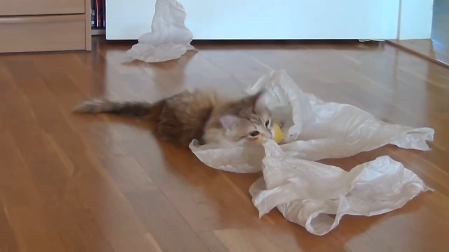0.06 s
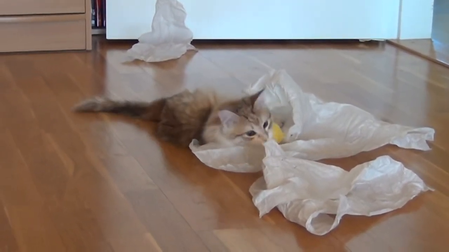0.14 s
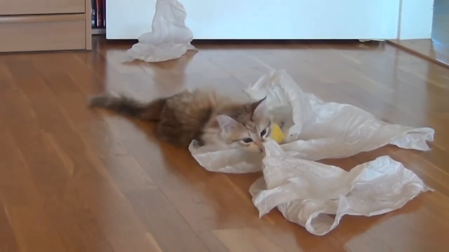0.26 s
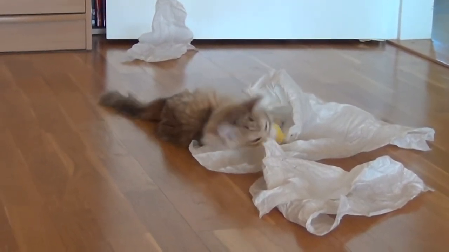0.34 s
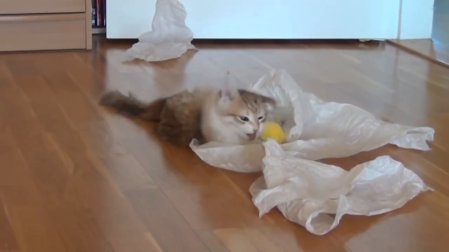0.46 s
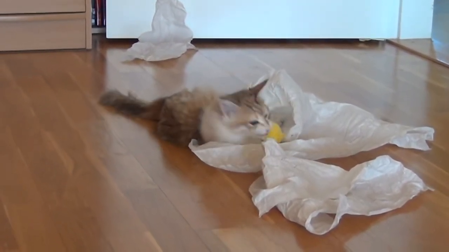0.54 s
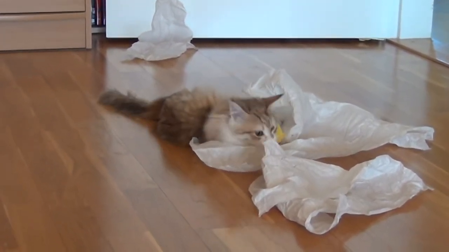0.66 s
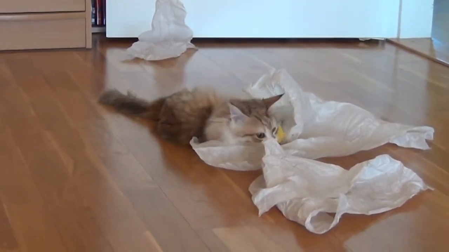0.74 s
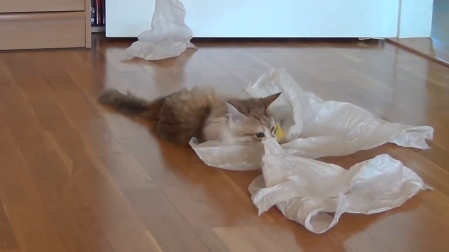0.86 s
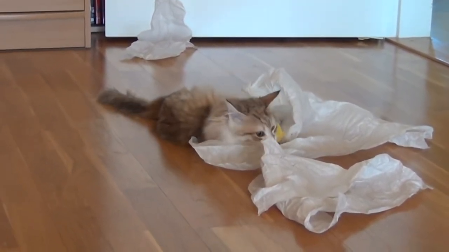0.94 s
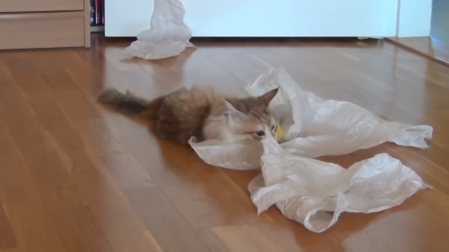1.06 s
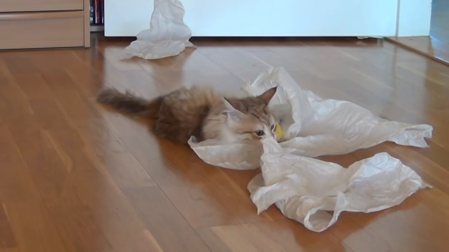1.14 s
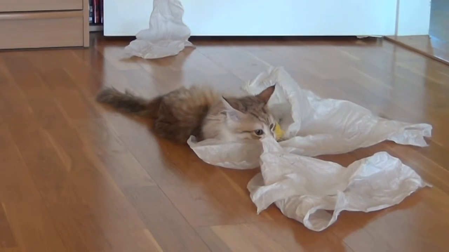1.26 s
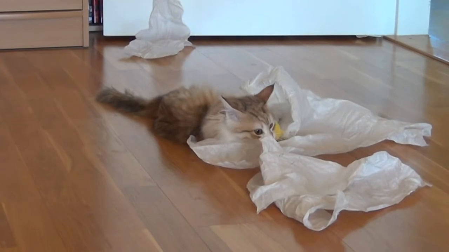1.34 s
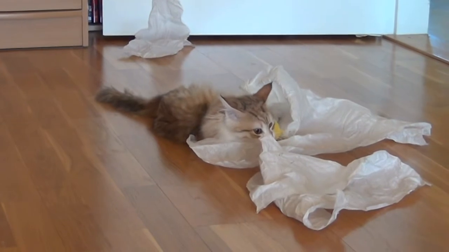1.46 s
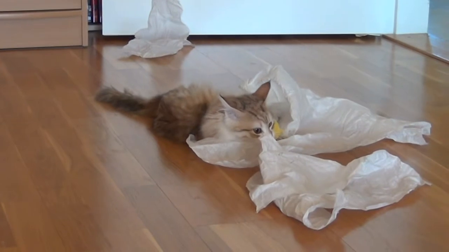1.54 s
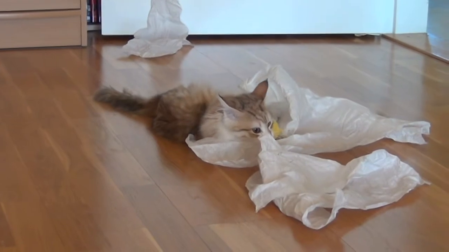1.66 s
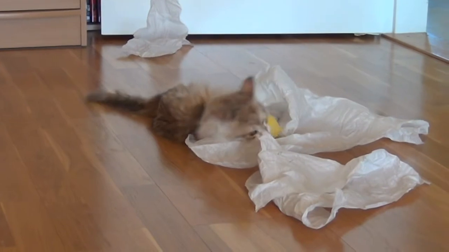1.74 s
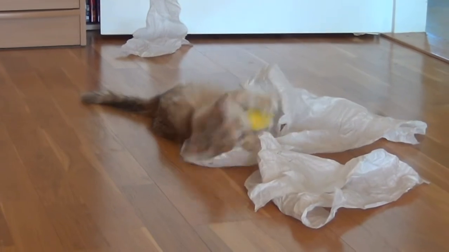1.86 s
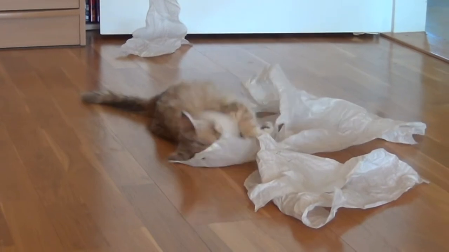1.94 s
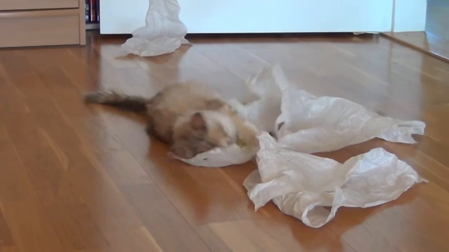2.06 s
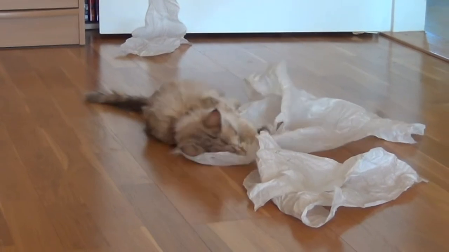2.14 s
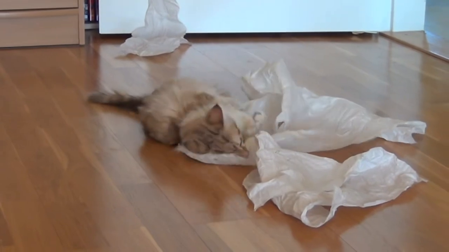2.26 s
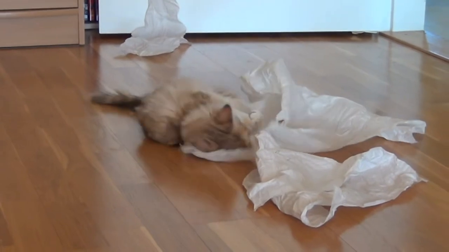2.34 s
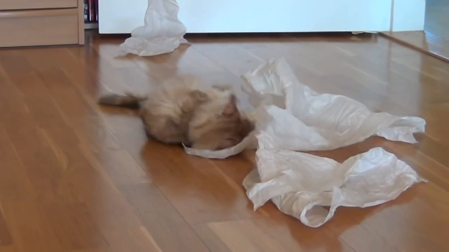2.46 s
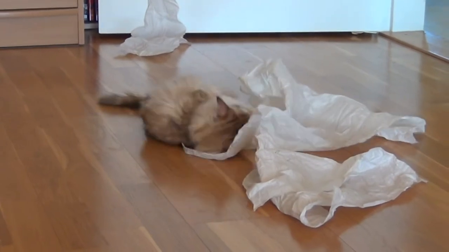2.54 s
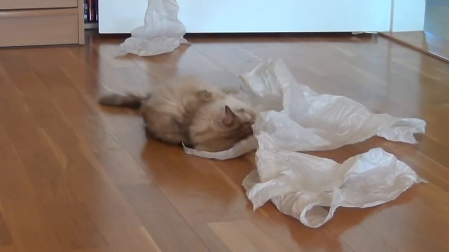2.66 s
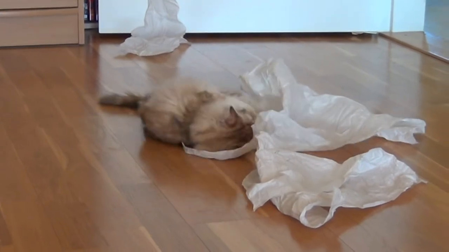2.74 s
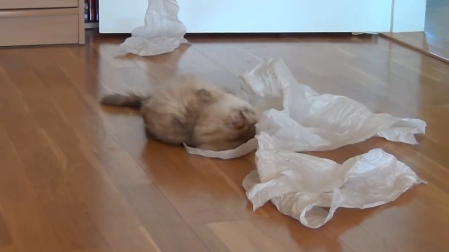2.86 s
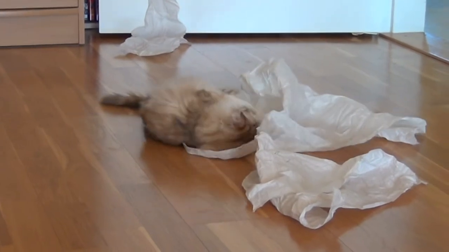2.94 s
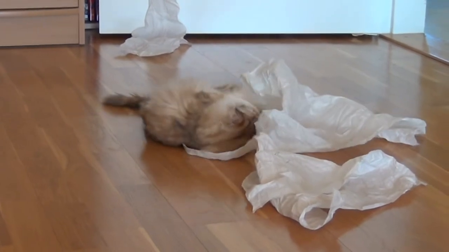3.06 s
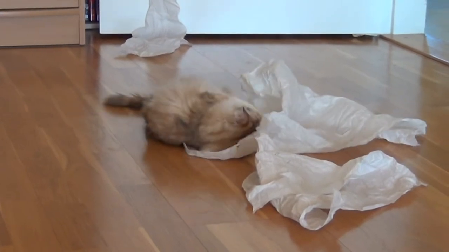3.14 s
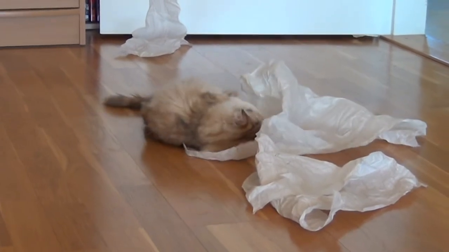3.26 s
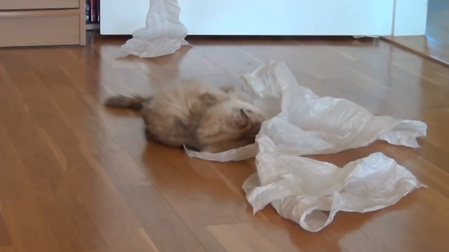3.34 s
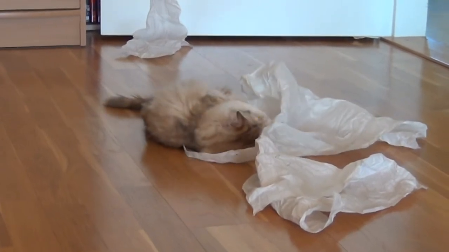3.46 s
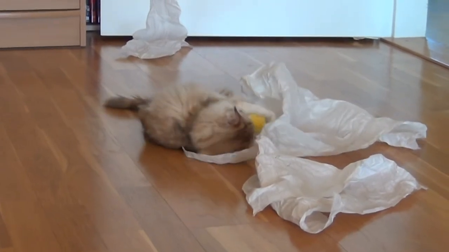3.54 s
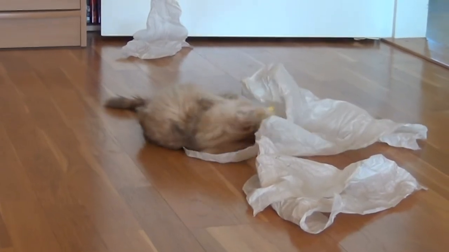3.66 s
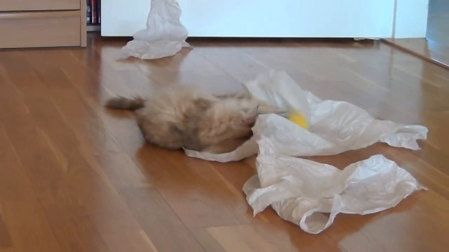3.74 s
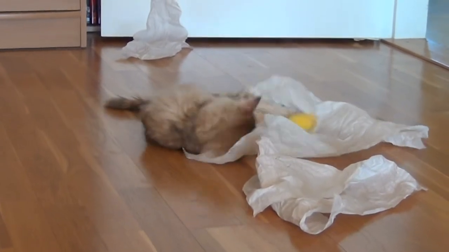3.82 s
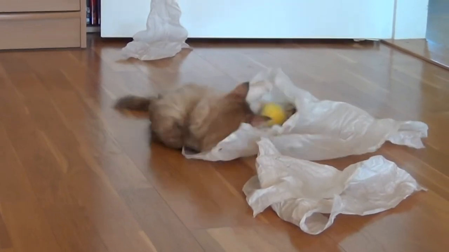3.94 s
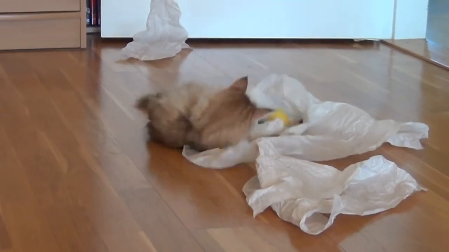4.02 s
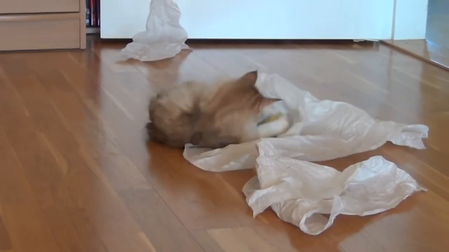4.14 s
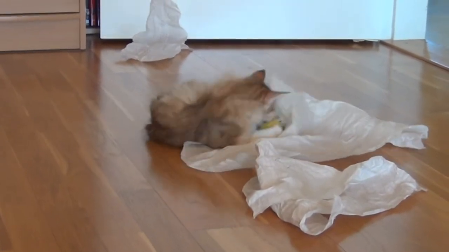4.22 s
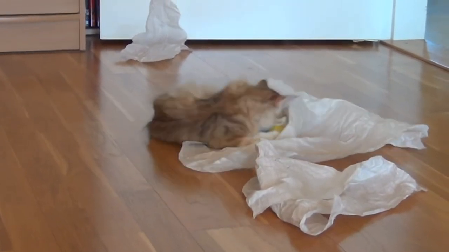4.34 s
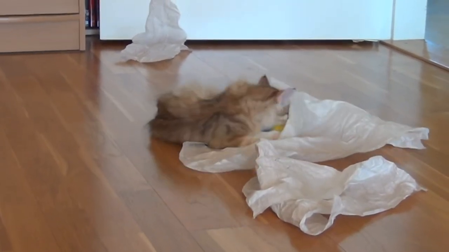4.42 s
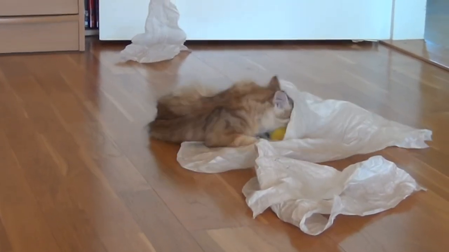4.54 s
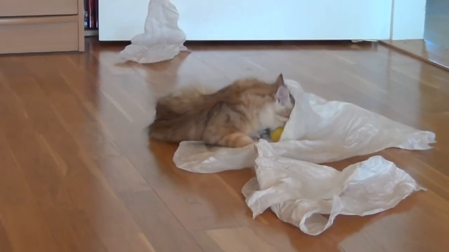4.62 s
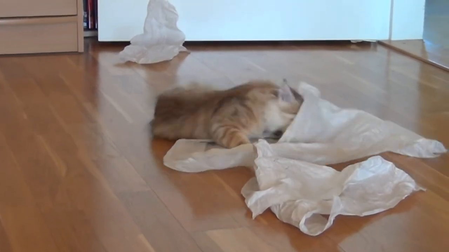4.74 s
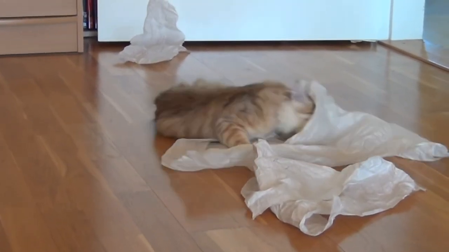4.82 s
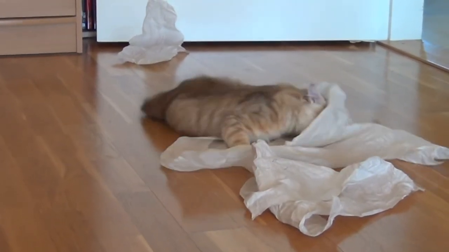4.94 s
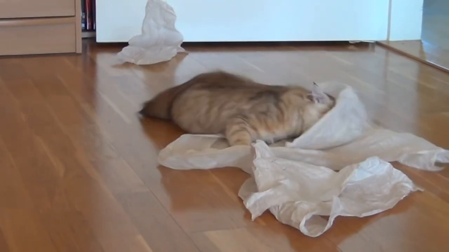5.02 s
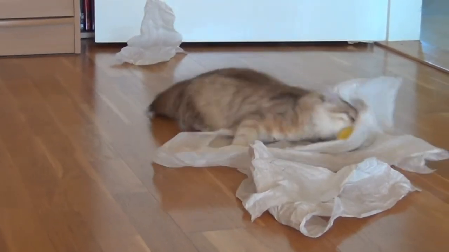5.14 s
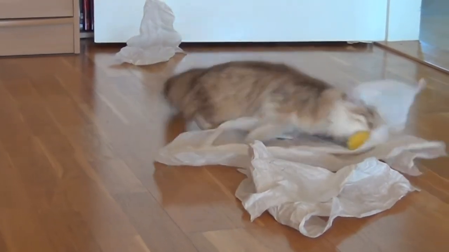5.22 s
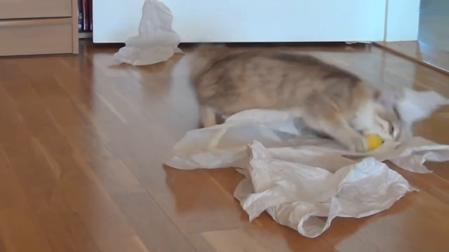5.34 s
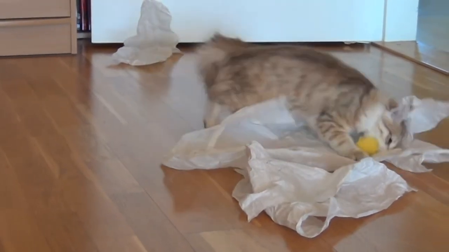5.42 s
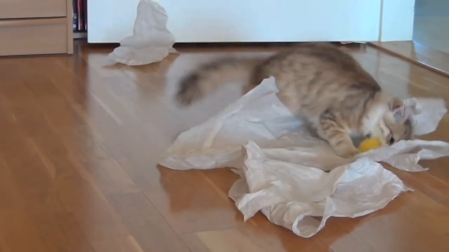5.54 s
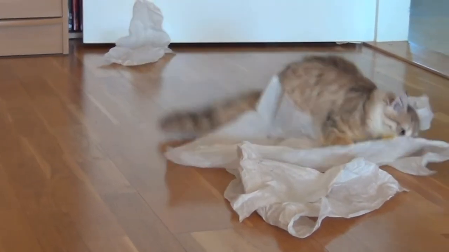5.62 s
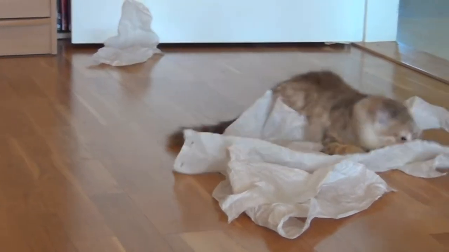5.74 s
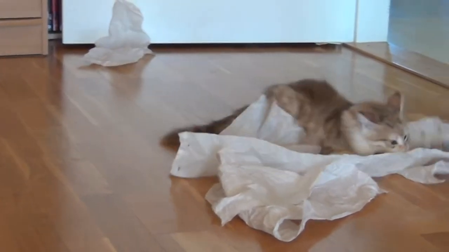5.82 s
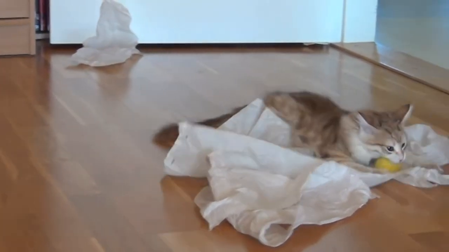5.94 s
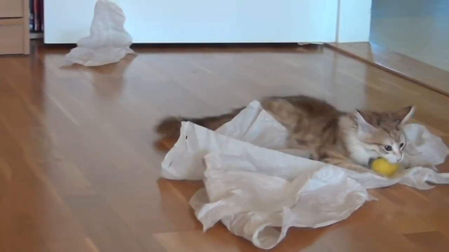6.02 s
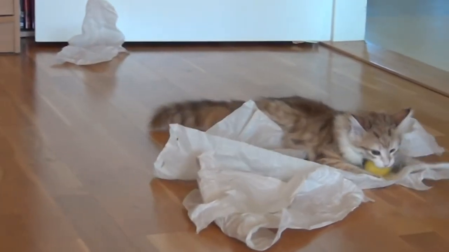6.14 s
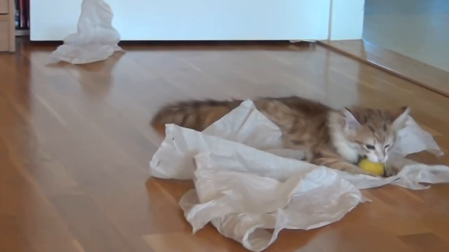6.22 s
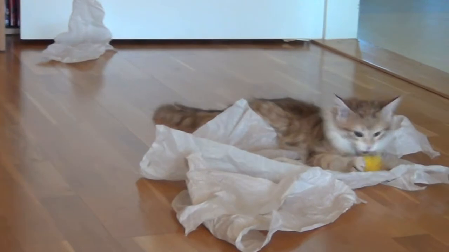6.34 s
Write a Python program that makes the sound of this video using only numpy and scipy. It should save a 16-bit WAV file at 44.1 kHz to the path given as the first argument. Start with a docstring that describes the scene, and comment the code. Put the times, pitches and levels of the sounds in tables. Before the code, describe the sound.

Light papery crackles fall nearly silent, then swell into busy, bright crumpling as a cat wrestles thin sheets in a bare, slightly echoing room.

```python
"""On a wooden floor in a bare room, a few metres from a camera, a cat noses, rolls and pounces in
crumpled tissue paper. The papery rush is thousands of tiny damped pops mixed with noise, tight creases
snap in bright bursts, hollows in the sheet ring briefly, and paws thump the boards with one low push.
The room answers with fading noise echoes, over a soft room tone and the camera's own hiss and whine."""
import sys
import numpy as np
from scipy import signal
from scipy.fft import rfft, irfft, next_fast_len
from scipy.io import wavfile
from scipy.ndimage import uniform_filter1d, map_coordinates

SR = 44100
rng = np.random.default_rng(int(sys.argv[2]) if len(sys.argv) > 2 else 0)


def gain_from_decibels(decibels):
    """Convert decibel values to linear amplitude factors."""
    exponent = np.asarray(decibels, float) / 20
    return 10 ** exponent


def store_pcm(level_fs):
    """Save levels as 16-bit WAV."""
    pcm = np.round(np.clip(level_fs, -1, 1) * 32767).astype(np.int16)
    wavfile.write(sys.argv[1], SR, np.atleast_2d(pcm).T)


N = 281358  # length in samples


def unit(x):
    """Scales a signal to rms 1."""
    return x / np.sqrt(np.mean(x ** 2) + 1e-20)


def along(points, hz):
    """Reads a curve of (Hz, value) points on a log frequency axis."""
    f, v = np.transpose(points)
    return np.interp(np.log(hz + 1), np.log(f + 1), v)


def wobble(rate):
    """A smooth random curve with rate knots a second."""
    knots = rng.standard_normal(int(N * rate / SR) + 4)
    return map_coordinates(knots, [np.arange(N) * rate / SR])


def filtered(x, response):
    """Shapes a signal by a response that depends on frequency."""
    m = next_fast_len(x.shape[-1] + 8192)
    spectrum = rfft(x, m) * response(np.fft.rfftfreq(m, 1 / SR))
    return irfft(spectrum, m)[..., :x.shape[-1]]


def paired(two, alike):
    """Mixes two unrelated signals into a left and right of given likeness at each frequency."""
    def mid_and_side(hz):
        turn = np.arccos(np.clip(along(alike, hz), -1, 1)) / 2
        return np.array([np.cos(turn), np.sin(turn)])

    mid, side = filtered(two, mid_and_side)
    return np.array([mid + side, mid - side])


def pops(s, hz, gain, cycles, size):
    """Sums damped sines at their times; each falls by 1/e in cycles / hz seconds."""
    t = np.arange(size) / SR
    decay = np.exp(-t * hz[:, None] / cycles)
    wave = gain[:, None] * np.sin(2 * np.pi * hz[:, None] * t) * decay
    at = np.round(s * SR).astype(int)[:, None] + np.arange(size)
    return np.bincount(at.ravel(), wave.ravel(), N + SR)[:N]


def burst(gain):
    """Gives each row of pops the same total energy."""
    return gain / np.linalg.norm(gain, axis=1, keepdims=True)


# How much the sheet creeps and settles between the cat's moves.
# Each row: time in seconds, level in dB.
STIR_LEVELS = [(0.0, -62), (0.7, -68), (1.3, -71), (1.87, -78), (2.0, -52.5), (2.5, -45.5), (3.3, -54),
               (3.9, -47.5), (4.15, -40.5), (4.55, -43), (5.2, -42), (5.5, -39.5), (5.7, -45.5),
               (5.97, -36.5), (6.16, -38), (6.25, -56), (6.38, -44)]
# The cat's nudges, rolls and pounces.
# Each row: peak time in seconds, level in dB, rise in ms, fall in ms, crispness in dB.
CAT_MOVES = [(0.001, -49.5, 10, 39, -3), (0.039, -53.5, 17, 33, -12), (0.085, -58, 9, 32, 2),
             (0.242, -55, 7.4, 47, -11.5), (0.503, -59.5, 17, 131, -7), (0.585, -51.5, 24, 92, 0.6),
             (0.684, -60, 36, 93, -2), (0.872, -58, 40, 69, -1.4), (0.943, -64.0, 11, 25, -4),
             (1.042, -52, 8.7, 40, -2), (1.143, -60, 17, 22, 1), (1.294, -60.5, 40, 41, -7),
             (1.912, -53, 18, 165, 0), (1.997, -47, 12, 236, 0), (2.041, -33.5, 22, 106, -2),
             (2.098, -34, 35, 77, 0.7), (2.261, -34, 73, 150, 0.5), (2.424, -42, 37, 27, 0.5),
             (2.53, -35, 19, 150, 0), (2.6, -33.5, 79, 49, 0), (2.69, -42, 20, 190, -2.5),
             (2.816, -42.5, 57, 140, -2.9), (2.961, -43, 170, 220, -4.4), (3.024, -44, 17, 240, -1.2),
             (3.234, -46, 72, 45, -1), (3.336, -48, 18, 52, -4.5), (3.44, -44, 30, 79, -6.5),
             (3.611, -49, 11, 217, -1.5), (3.715, -46, 98, 68, -7), (3.789, -40.5, 16, 52, -5),
             (3.824, -39, 22, 41, 0.5), (3.962, -31.5, 55, 120, 0), (4.103, -38.5, 73, 82, 0),
             (4.282, -29, 57, 30, 1.3), (4.393, -34, 24, 53, -1.5), (4.438, -33, 72, 41, 1.5),
             (4.67, -36, 24, 135, 1.2), (4.891, -33.5, 38, 130, -0.7), (4.979, -34.5, 14, 140, 4.5),
             (5.065, -32, 59, 150, 1.1), (5.298, -32, 85, 146, 3.1), (5.398, -34, 48, 240, 1.6),
             (5.587, -34.5, 57, 79, 2.2), (5.709, -37.5, 39, 29, 6), (5.766, -28, 7.3, 90, 4.5),
             (5.834, -32, 58, 30, -6.5), (6.03, -39, 120, 65, 6), (6.073, -25.5, 23, 33, 2.5),
             (6.199, -38.5, 63, 44, 3.5), (6.289, -37, 35, 62, 0.1), (6.375, -32, 21, 87, 1)]


def worked():
    """Levels in dB of billows, folds and creases: every move swells and dies over the slow stir."""
    billows_db, creases_db = -7.5, -0.25  # against the folds
    stir_crisp_db = -1.5  # crispness between moves
    crisp_thins = 0.86  # dB the billows lose for each dB of crispness
    swing_db = 10  # a move gains this much over its rise and loses it over its fall
    t = np.arange(0, N + 44, 44) / SR
    s, db, rise_ms, fall_ms, crisp_db = np.transpose(CAT_MOVES)[:, :, None]
    late_ms = 1000 * (t - s)
    slope_ms = np.maximum(np.where(late_ms < 0, rise_ms, fall_ms), 2)
    move_db = db - swing_db * np.abs(late_ms) / slope_ms
    stir_db = np.interp(t, *np.transpose(STIR_LEVELS))

    def total(follows):  # follows: how far this part of the paper sound obeys crispness
        moves = np.sum(gain_from_decibels(2 * (move_db + follows * crisp_db)), axis=0)
        stir = gain_from_decibels(2 * (stir_db + follows * stir_crisp_db))
        return 10 * np.log10(moves + stir)

    levels_db = billows_db + total(-crisp_thins), total(0), creases_db + total(1)
    return [np.interp(np.arange(N) / SR, t, level) for level in levels_db]


def gives(rate, fade_s):
    """A curve that jumps whenever the sheet gives way, then sinks back; rms 1 about zero."""
    jumps = (rng.random(N) < rate / SR) * rng.random(N)
    curve = signal.lfilter([1], [1, -np.exp(-1 / (fade_s * SR))], jumps)
    return unit(curve - curve.mean())


def crackle(count, size, centre_hz, octaves, cycles, scatter_db, clump_db, slide, spectrum):
    """Countless small buckles of uneven size and pitch, in clumps, over the hiss of sliding sheets; rms 1."""
    s, chance = rng.random((2, count))
    hz = np.clip(centre_hz * 2 ** (octaves * rng.standard_normal(count)), 150, 15000)
    size_db = np.minimum(-scatter_db * np.log(1 - chance), 15)
    gain = gain_from_decibels(size_db) * rng.choice([-1, 1], count)
    grains = unit(pops(s * N / SR, hz, gain, cycles, size))

    def evened(f):  # flattens the grains' broad spectrum before the wanted one is applied
        power = np.abs(rfft(grains, 2 * len(f) - 2)) ** 2
        return 1 / np.sqrt(uniform_filter1d(power, size=3000) / N + 1e-4)

    mix = unit(filtered(grains, evened)) + slide * rng.standard_normal(N)
    clumps = gain_from_decibels(clump_db * (wobble(25) + 0.78 * wobble(70)))
    return unit(clumps * filtered(mix, lambda f: gain_from_decibels(along(spectrum, f))))


# Tone colour of the wide billows, the folds and the tight creases.
# Each row of all three: frequency in Hz, relative level in dB per Hz.
BILLOW_COLOUR = [(59, -52), (100, -22), (118, -20.5), (305, -6), (398, -13.5), (464, -12.5), (501, -11),
                 (698, 0.5), (880, -1), (1400, -4.5), (1820, -40), (3080, -120)]
FOLD_COLOUR = [(820, -36), (1400, -3.5), (2540, -2.5), (2770, -4), (3190, -3), (3620, -4.5), (6500, -9.5),
               (8450, -13), (14300, -120)]
CREASE_COLOUR = [(2940, -13), (5000, -10), (8590, -5.5), (11200, -2), (15100, -14.5), (15700, -15.5)]


def rustle():
    """Billows of the whole sheet give the low part, folds the middle, creases the bright top; all jump together."""
    billows = crackle(count=5000, size=300, centre_hz=775, octaves=0.73, cycles=1.43,
                      scatter_db=2.5, clump_db=0.1, slide=0.98, spectrum=BILLOW_COLOUR)
    folds = crackle(count=12000, size=120, centre_hz=2628, octaves=0.72, cycles=1.76,
                    scatter_db=2.0, clump_db=-0.34, slide=1.0, spectrum=FOLD_COLOUR)
    creases = crackle(count=22000, size=48, centre_hz=9200, octaves=0.37, cycles=1.15,
                      scatter_db=3.5, clump_db=0.39, slide=1.0, spectrum=CREASE_COLOUR)
    jolt = gives(rate=46, fade_s=0.01)
    parts = gain_from_decibels(0.55 * jolt) * billows, gain_from_decibels(1.05 * jolt) * folds, gain_from_decibels(1.39 * jolt) * creases
    return sum(gain_from_decibels(db) * part for db, part in zip(worked(), parts))


# Single snaps of a crease.
# Each row: start in seconds, level in dB, level of the fold part in dB relative to the snap.
CREASE_SNAPS = [(0.0283, -39, 0.5), (0.0802, -31.5, -6), (0.2404, -35, -4), (0.4997, -26, -12),
                (0.5442, -32, -19), (0.558, -39, -10), (0.5727, -26, -9.5), (0.5814, -33, -20),
                (0.5937, -21.5, -30), (0.6014, -39, -20), (0.6144, -40, -12), (0.6836, -37, -5),
                (0.727, -36, -20), (0.785, -34.5, -7), (0.8754, -34, -10), (0.9467, -34, -12),
                (1.0346, -36, 1), (1.0515, -33, -2), (1.064, -36, -3), (1.1372, -31, -5.5),
                (1.286, -50, 10.5), (1.7736, -39, -21), (1.9055, -38, -17), (1.9924, -25, -12),
                (2.0163, -19, -13), (2.0253, -16, -21), (2.0396, -13, -19), (2.0624, -10, -27),
                (2.3094, -20, -16), (2.4694, -20, -12), (2.476, -30, -16), (2.5107, -24, -7),
                (2.6106, -19, -11), (2.7074, -24, -14), (2.7367, -26, -7), (2.812, -20, -11),
                (2.9924, -22, -27), (3.5278, -25, -6), (3.6098, -29, -2), (3.7885, -15.5, -18),
                (3.8873, -29, -17), (3.913, -24, -4), (3.9559, -17, -1), (4.1017, -17.5, -6),
                (4.4435, -15, -21), (4.7007, -19, -6), (4.9684, -17, -25), (5.5791, -13.5, -1.5),
                (5.7014, -17, -24), (5.7642, -17, -8), (5.7794, -6, -21), (5.7944, -13, -12),
                (6.0206, -18, -17), (6.0704, -13.5, -4), (6.2104, -15, -25), (6.2711, -21, -14)]


def snaps():
    """A crease gives way in a dense burst of shrinking pops, and the fold around it flaps a little longer."""
    usual_hz, scatter_octaves = 10160, 0.074
    small_over_creases_db, small_scatter_db, small_fold_db = 12.5, 1, -12
    # lesser snaps come at random, their level following the creases
    when, luck = rng.random(size=(200, 2)).T
    creases_db = worked()[-1][(when * N).astype(int)]
    small_db = creases_db + small_over_creases_db - small_scatter_db * np.log(1 - luck)
    small = np.transpose([when * N / SR, small_db, np.full(len(when), small_fold_db)])
    s, db, fold_db = np.transpose(np.vstack([CREASE_SNAPS, small]))[:, :, None]
    hz = usual_hz * 2 ** (scatter_octaves * rng.standard_normal(s.shape))

    late, tune, size, flap = np.moveaxis(rng.random((len(s), 4, 16)), 1, 0)  # 16 pops a snap
    wait = late ** 1.8  # most pops crowd the start
    crisp_s = s + .0006 + .0035 * wait
    crisp_hz = np.clip(hz * 2 ** (0.74 * tune - .35), 0, 15000)
    crisp_gain = gain_from_decibels(db + 1.5) * burst(gain_from_decibels(-24 * wait - 2.3 * size))
    crisp = pops(crisp_s.ravel(), crisp_hz.ravel(), crisp_gain.ravel(), cycles=2.56, size=100)

    flap_s = s + .0006 + .012 * wait
    flap_hz = 1500 * 2 ** (2.01 * flap)
    flap_gain = gain_from_decibels(db + fold_db + 4.0) * burst(gain_from_decibels(-12 * wait - 3.5 * size))
    flap_gain = flap_gain * np.sqrt(flap_hz / 2500)  # low flaps last longer but move less
    return crisp + pops(flap_s.ravel(), flap_hz.ravel(), flap_gain.ravel(), cycles=1.55, size=200)


# Hollows in the paper popping through.
# Each row: start in seconds, level in dB, pitch in Hz.
PAPER_DENTS = [(0.039, -29, 2010), (0.5, -32, 2010), (0.572, -30, 3230), (1.034, -30, 3780),
               (1.052, -30, 3130), (1.285, -38, 1430), (1.899, -36, 4300), (2.024, -26, 915),
               (2.431, -25, 1600), (2.511, -22, 1420), (2.785, -25, 1590), (2.808, -18, 1670),
               (3.027, -22, 2780), (3.348, -24, 2060), (3.783, -27, 940), (3.956, -22, 1610),
               (4.266, -12, 2270), (4.378, -18, 2200), (5.124, -18, 1060), (5.329, -11, 2530),
               (5.702, -21, 3240), (5.764, -20, 1170), (6.046, -14, 1920), (6.065, -16, 1630)]


def dents():
    """A stiff hollow in the sheet flips inside out and rings for a few cycles."""
    s, db, hz = np.transpose(PAPER_DENTS)
    return pops(s + 0.00061, hz, gain_from_decibels(db - 9.0), cycles=5.7, size=900)


# Paws and body landing on the boards.
# Each row: start in seconds, level in dB, pitch in Hz.
PAW_THUMPS = [(2.108, -28, 287), (2.427, -44, 222), (5.764, -42, 260)]


def thumps():
    """A soft paw gives the boards one low push that dies within a few cycles; the floor rumbles on briefly."""
    boards_t60_s, boards_db = .35, -3.5  # the rumble's decay, and its strength against the push
    s, db, hz = np.transpose(PAW_THUMPS)
    push = pops(s, hz, gain_from_decibels(db + 12.5), cycles=1.7, size=3000)
    t = np.arange(SR // 2) / SR
    ring = rng.standard_normal(SR // 2) * gain_from_decibels(-60 * t / boards_t60_s)
    rumble = gain_from_decibels(boards_db) * signal.fftconvolve(push, ring / np.linalg.norm(ring))[:N]

    def boards(f):  # cuts below 170 Hz and above 500 Hz
        return (1j * f / (170 + 1j * f)) ** 2 / (1 + 1j * f / 500) ** 3

    return filtered(push + rumble, boards)


# How long the room rings. Each row: frequency in Hz, time to fall by 60 dB in seconds.
ROOM_DECAY = [(200, 0.44), (1000, 0.37), (4000, 0.38), (12000, 0.17)]
# How alike the echoes are left and right. Each row: frequency in Hz, likeness (1 is identical).
ECHO_LIKENESS = [(100, 0.99), (700, 0.9), (2000, 0.63), (5000, 0.033), (10000, 0.25), (15000, .6)]


def room(x):
    """Bare walls and floor: each frequency dies at its own speed, in noise echoes."""
    out = np.zeros((2, N + 2 * SR))
    piece = SR // 22  # echoes are redrawn for every short piece so no fixed tone builds up
    for start in range(0, N, piece):
        hz, t, z = signal.stft(rng.standard_normal((2, SR // 2)), SR, nperseg=256)
        fade = gain_from_decibels(-60 * t / along(ROOM_DECAY, hz)[:, None])
        tail = paired(signal.istft(z * fade, SR, nperseg=256)[1], ECHO_LIKENESS)
        tail = tail / np.linalg.norm(tail[0])
        echo = signal.fftconvolve(x[None, start:start + piece], tail, axes=1)
        out[:, start + 60:][:, :echo.shape[1]] += echo  # echoes start 60 samples late
    return out[:, :N]


# Colour of the room tone and hiss. Each row: frequency in Hz, relative level in dB per Hz.
TONE_COLOUR = [(18, -59), (30, -22), (59, -10), (148, -2.5), (173, -5.5), (208, -2.5), (410, -5),
               (444, -4.5), (493, -7), (533, -3), (853, -3), (1020, -5), (2840, -15), (12300, -21.5),
               (15600, -14.5)]
# How alike the tone and hiss are left and right. Each row: frequency in Hz, likeness (1 is identical).
TONE_LIKENESS = [(60, 0.98), (180, 0.95), (550, 0.64), (1650, 0.44), (4970, 0.43), (15000, 0.88)]
# The camera's thin whine. Each row: pitch in Hz, peak level in dB.
CAMERA_WHINE = [(15628, -84)]


def background():
    """Shaped noise makes steady room tone and hiss; a sine makes a thin whine at the top of hearing."""
    noise = paired(rng.standard_normal((2, N)), TONE_LIKENESS)
    noise = filtered(noise, lambda f: gain_from_decibels(along(TONE_COLOUR, f)))
    t = np.arange(N) / SR
    whine = sum(gain_from_decibels(db) * np.sin(2 * np.pi * hz * t) for hz, db in CAMERA_WHINE)
    return gain_from_decibels(-55.5) * unit(noise) + whine


# How the cat's sound leans to one side. Each row: frequency in Hz, left minus right in dB.
SIDE_LEAN = [(100, -1), (1000, 0), (4000, -1.2), (9000, -0.7), (14000, 0.4)]


def scene():
    """The cat's sounds reach the camera directly and through the room, thin in the bass."""
    cat = rustle() + snaps() + dents() + thumps()
    cat = filtered(cat, lambda f: (1j * f / (90 + 1j * f)) ** 5)
    heard = cat + gain_from_decibels(-5.5) * room(cat)
    halves = np.array([[.5], [-.5]])  # half the lean goes to each side
    leaning = filtered(heard, lambda f: gain_from_decibels(along(SIDE_LEAN, f) * halves))
    return leaning + background()


def band_limit(x):
    """A steep low-pass at the top of the band."""
    return signal.sosfilt(signal.butter(12, 17070, fs=SR, output="sos"), x)


def record(dry):
    """The camera takes in nothing above its band limit."""
    top_hz = 15760
    mix = filtered(dry, lambda f: f < top_hz)
    return band_limit(mix)


dry = scene()
out = record(dry)
store_pcm(out)
```